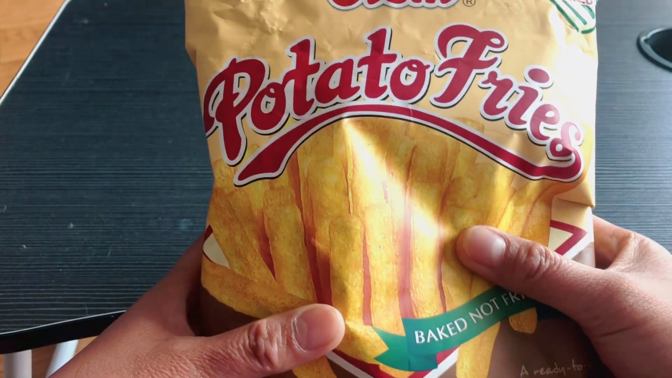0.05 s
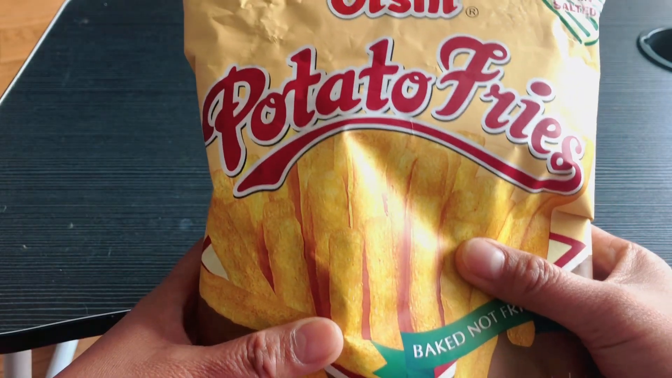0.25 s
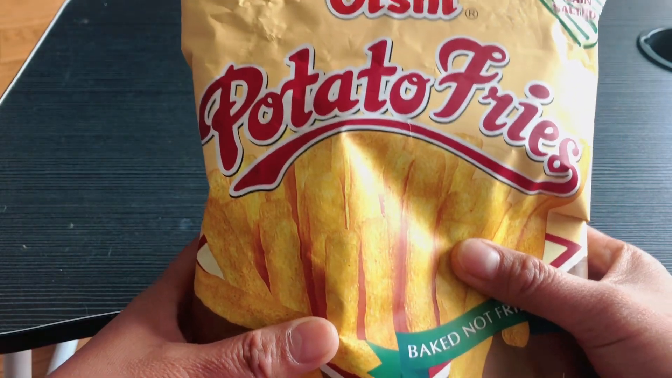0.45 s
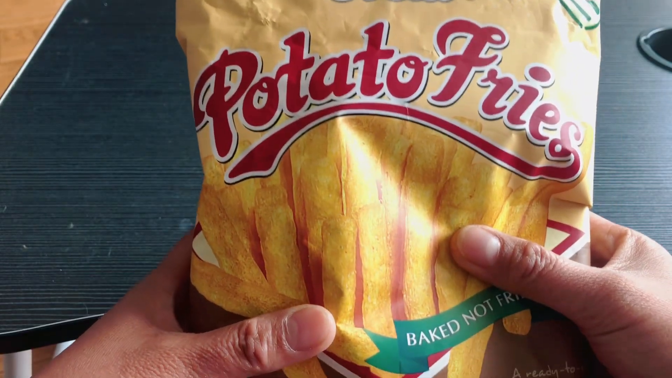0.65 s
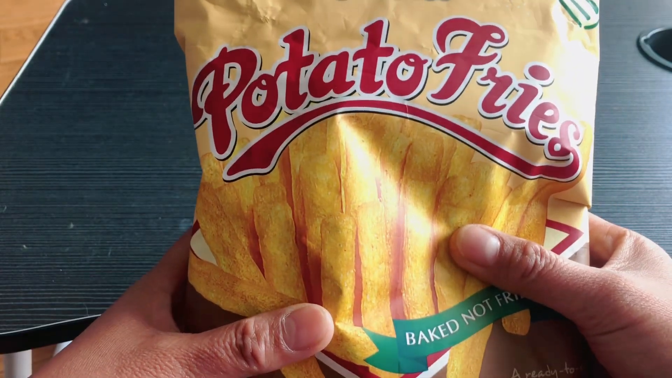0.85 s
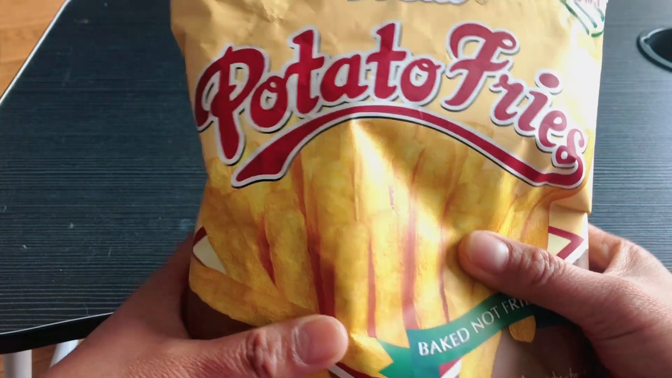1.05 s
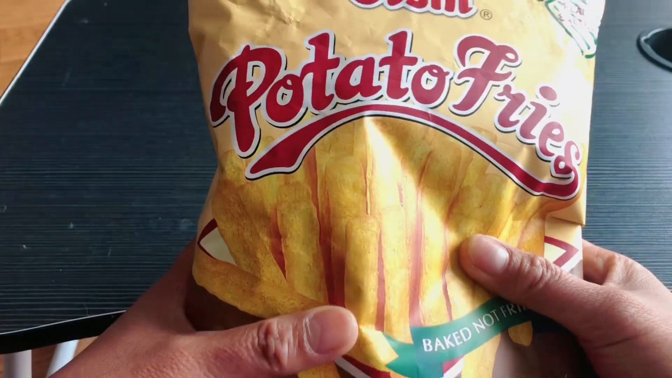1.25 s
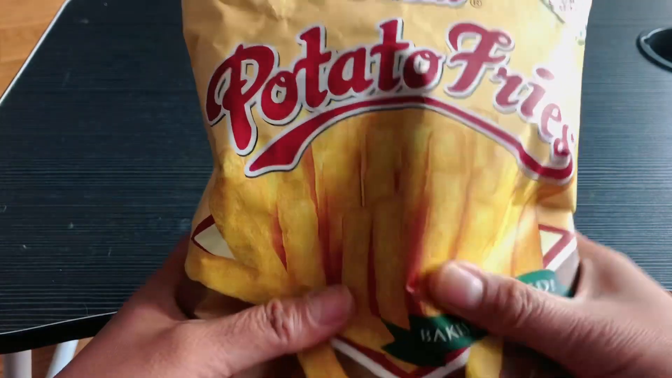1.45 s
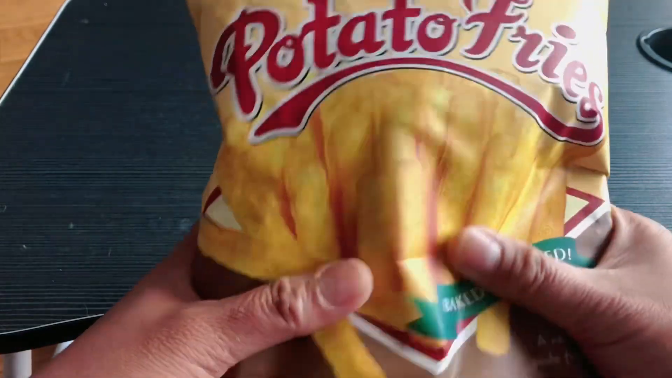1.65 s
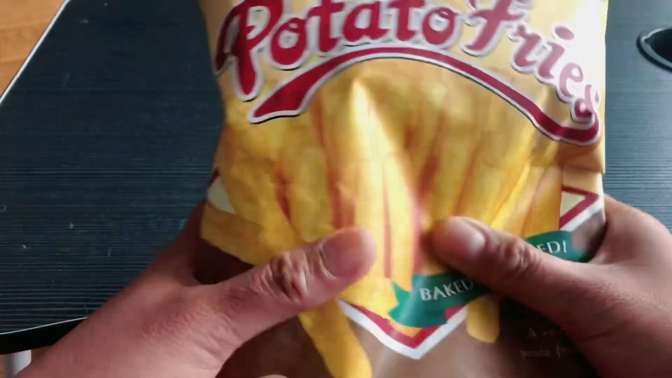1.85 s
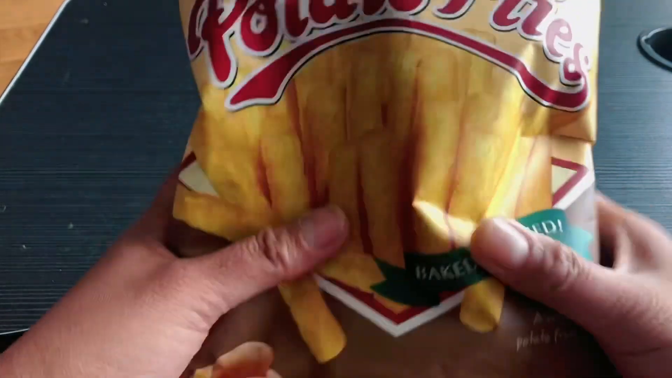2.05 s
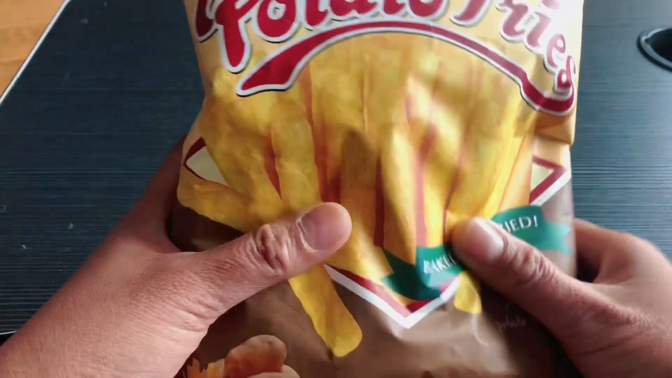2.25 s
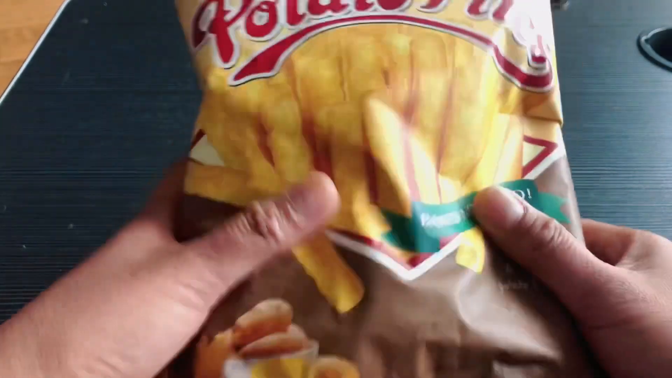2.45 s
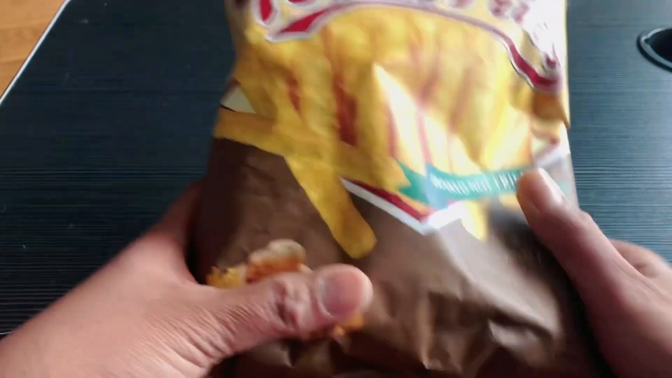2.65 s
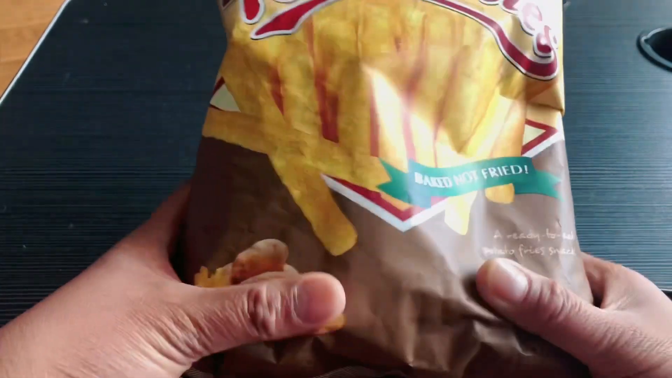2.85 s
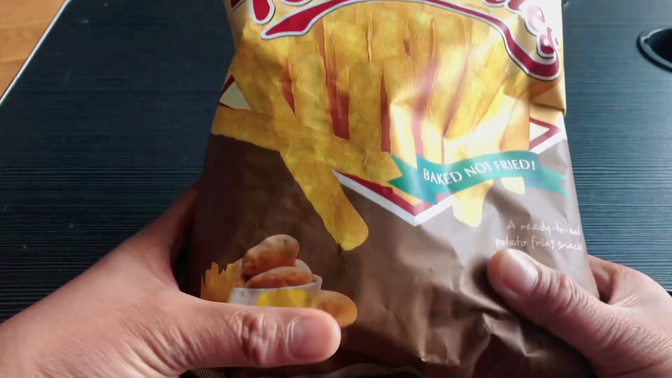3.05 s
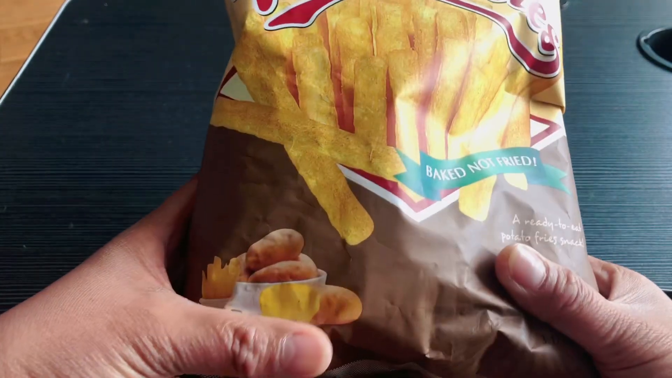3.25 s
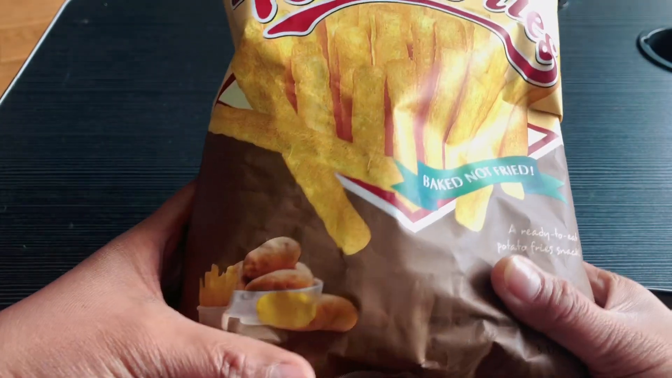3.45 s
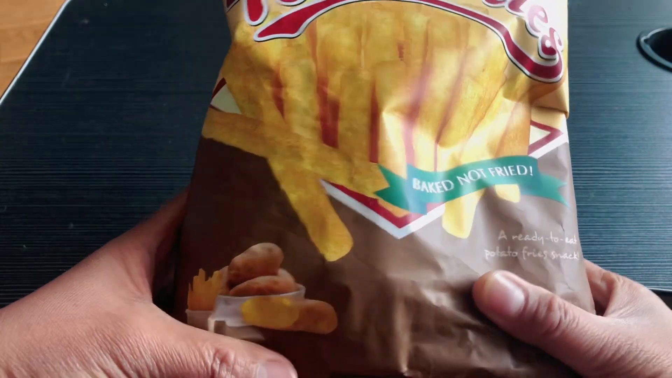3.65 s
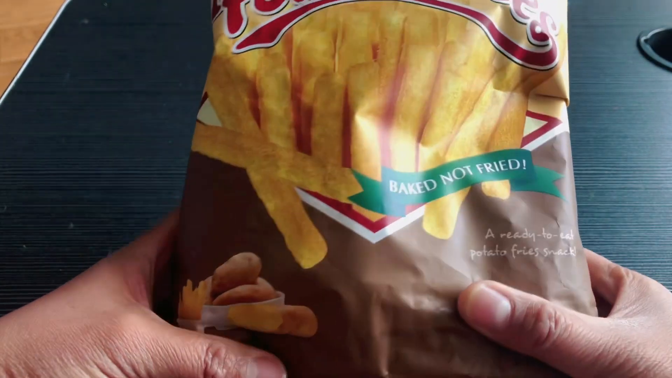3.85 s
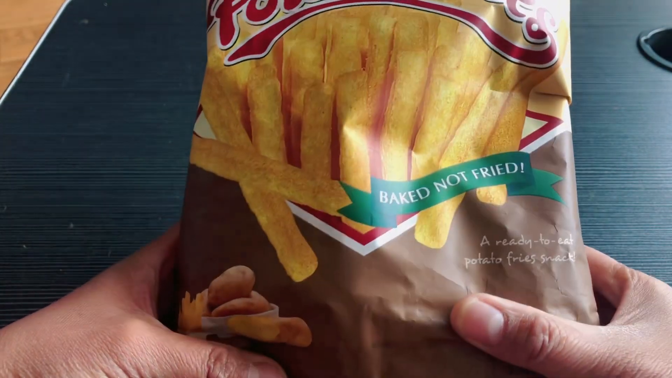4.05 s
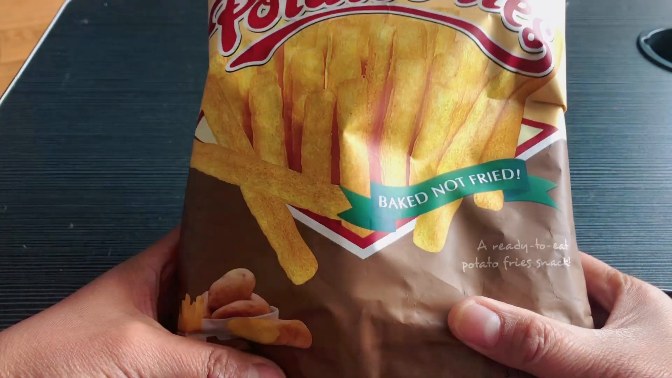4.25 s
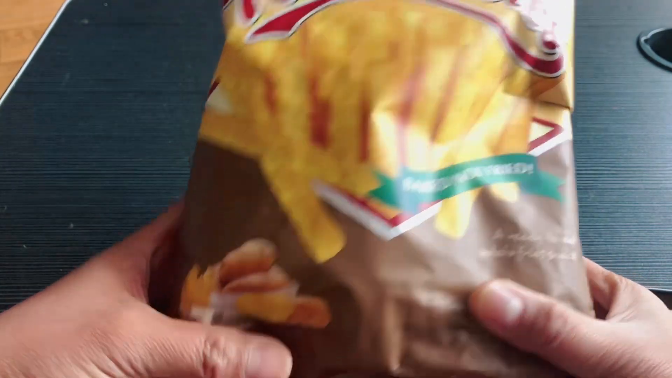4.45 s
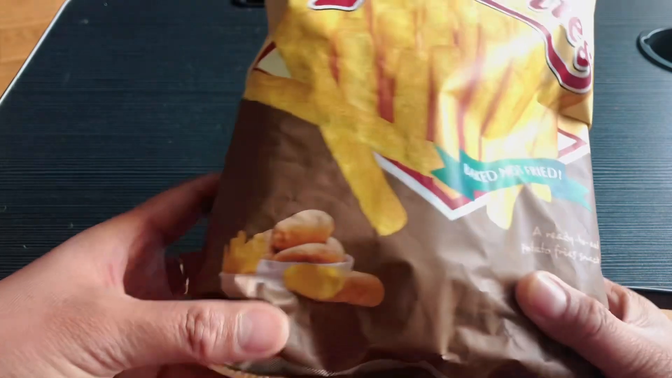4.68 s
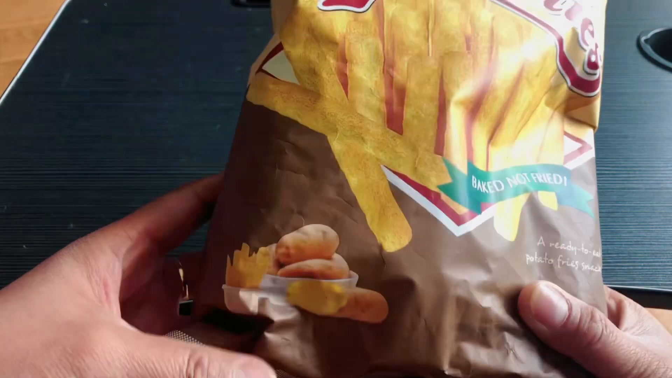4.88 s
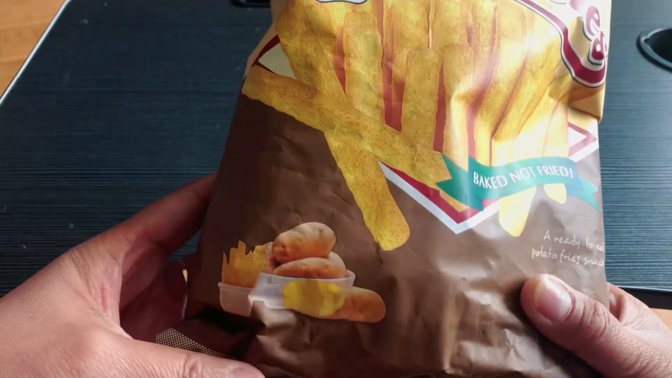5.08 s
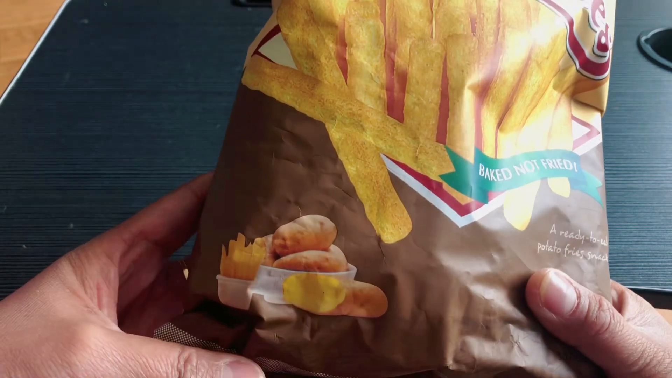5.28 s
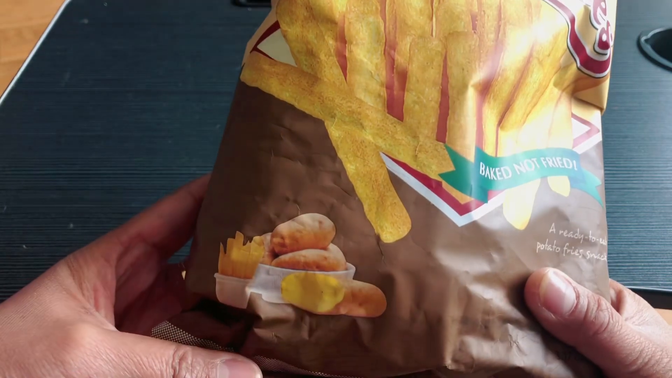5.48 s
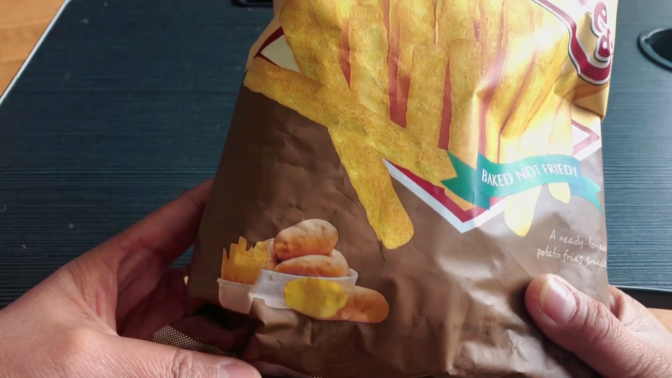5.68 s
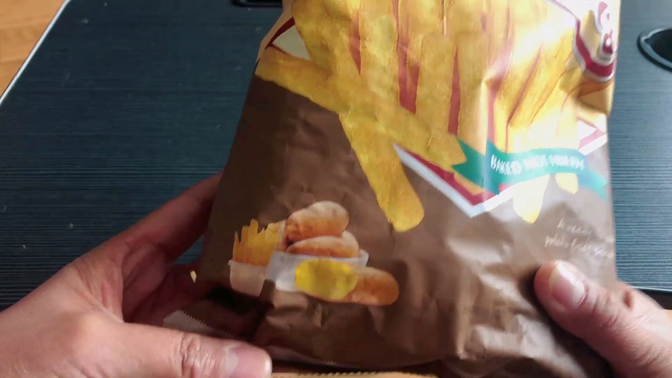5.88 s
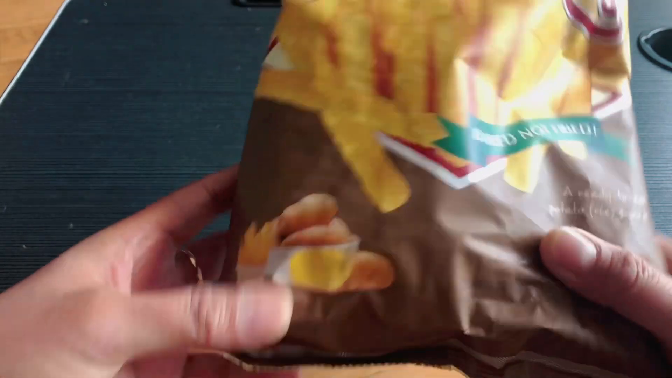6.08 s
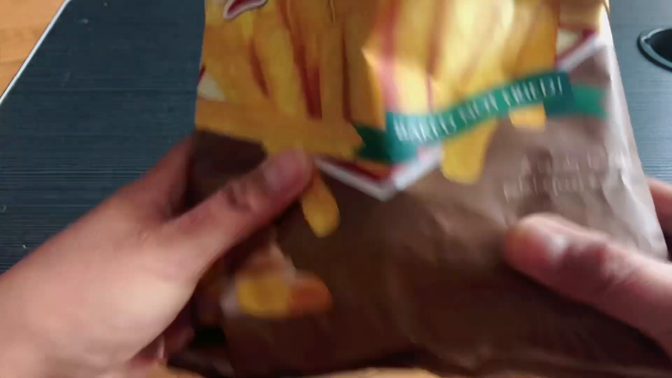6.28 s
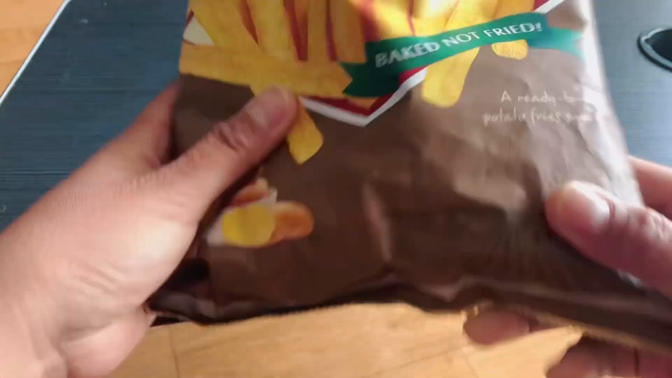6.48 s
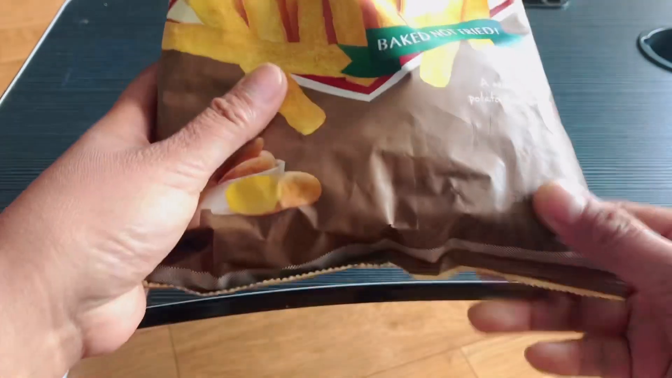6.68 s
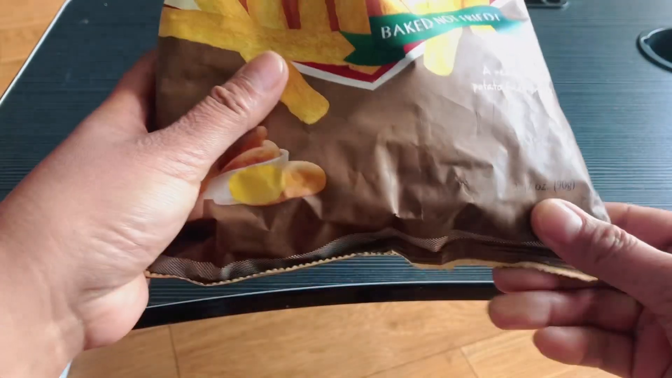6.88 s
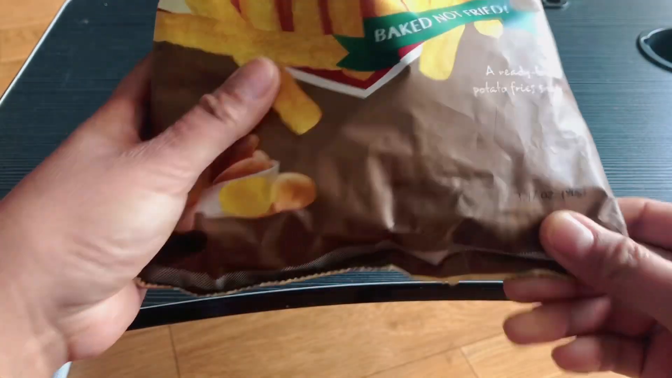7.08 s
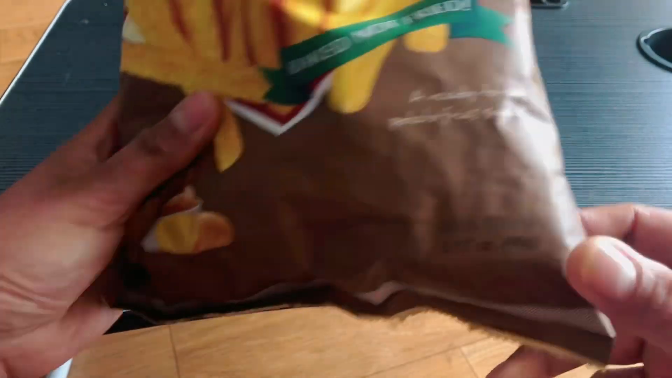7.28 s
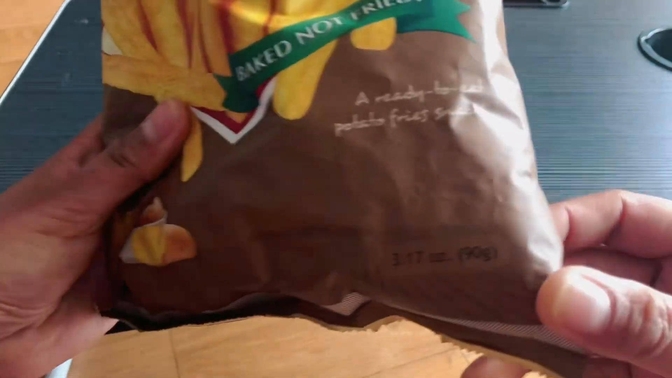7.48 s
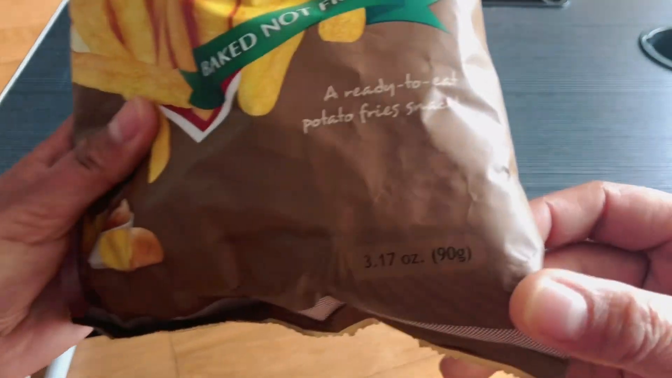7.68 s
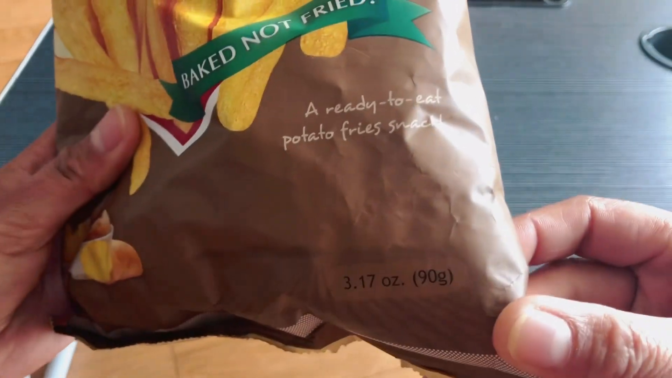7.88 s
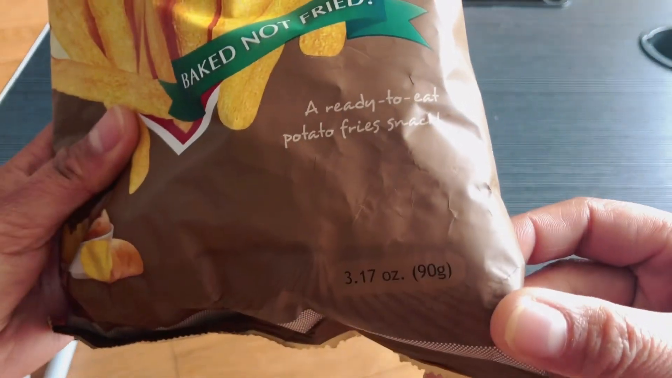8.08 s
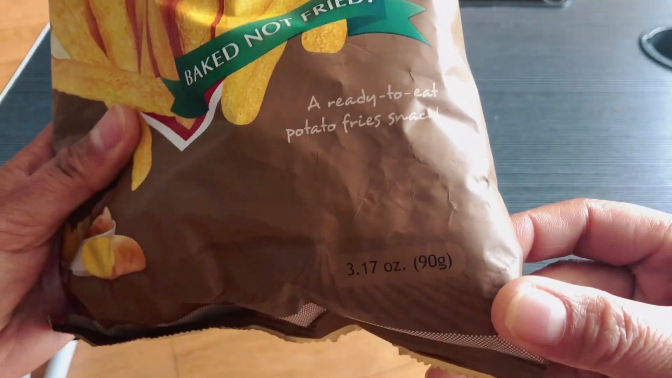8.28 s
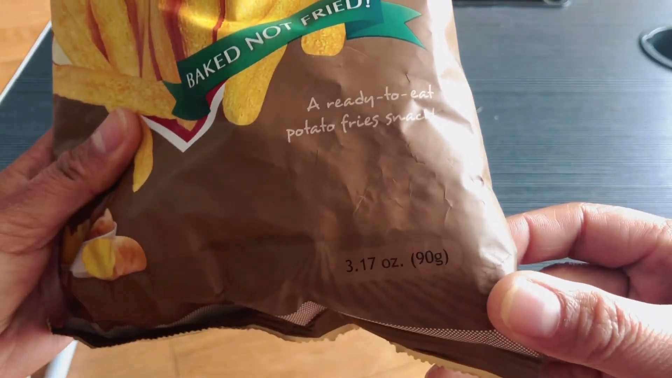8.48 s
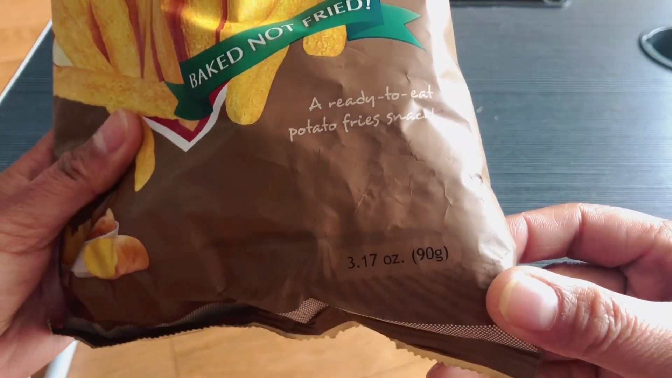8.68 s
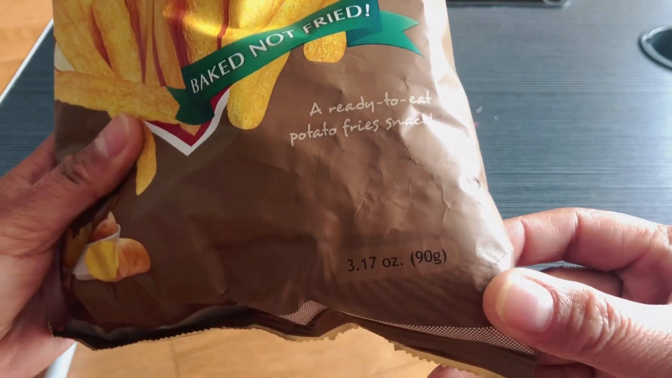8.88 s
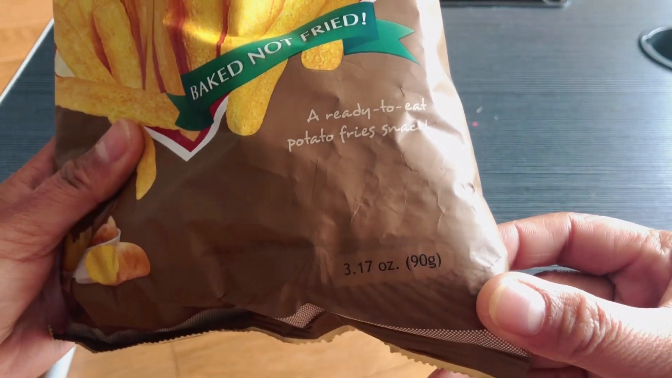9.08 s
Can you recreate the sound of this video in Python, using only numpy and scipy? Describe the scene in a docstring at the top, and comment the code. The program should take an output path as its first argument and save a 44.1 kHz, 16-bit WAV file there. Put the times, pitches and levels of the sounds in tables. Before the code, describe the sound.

A thin, air-filled plastic snack bag crackles and crinkles in handling hands, with soft air thuds, then settles into near silence in a quiet room.

```python
"""Two hands turn an air-filled plastic snack bag over a desk, close to a phone in a quiet room.
Over still air and faint mains hum, a few light ticks lead into a dense crackle from about 1 s; it thins near
4 s, gathers again near 5 s and 6 s, and dies to stray faint ticks after 8 s. Creases snap with bending waves that
chirp down through the film. Squeezes on top of the hands' steady strain drive lesser snaps, a swarm of tiny
buckles and the rub of fingers; trapped air thuds under the presses, and desk and walls echo the film."""
import sys
import numpy as np
from scipy import signal
from scipy.fft import rfft, irfft
from scipy.io import wavfile
from scipy.ndimage import uniform_filter1d

SR = 44100
rng = np.random.default_rng(int(sys.argv[2]) if len(sys.argv) > 2 else 0)


def int16_out(signal):
    """Quantize to a 16-bit WAV file."""
    q = np.round(np.clip(np.atleast_2d(signal).T, -1, 1) * 32767)
    wavfile.write(sys.argv[1], SR, q.astype(np.int16))


N = 402633
TIME = np.arange(N) / SR
TOP_HZ = 15900  # upper limit of the phone
SNAP_SIZE = 1024  # samples that hold one snap
FIRM_DB = -33  # crinkle level of a firm grip

# colour of the crinkling film: (pitch_hz, relative_level_db)
FILM_COLOUR = [(30, -50), (60, -14), (105, -3), (200, -2.5), (310, 1.5), (500, -8.5), (950, -3), (1700, -3),
               (3600, -10.5), (6500, -13.5), (8500, -16.5), (14500, -20.5), (16000, -31)]


def undb(db):
    """Decibels to gain."""
    return 10 ** (np.asarray(db) / 20)


def unit(x):
    """Scale to rms 1."""
    return x / np.sqrt(np.mean(x ** 2))


def slope(hz, points):
    """Gain at hz of (Hz, dB) points joined on a log-frequency axis."""
    at, db = np.transpose(points)
    return undb(np.interp(np.log(hz + 1), np.log(at), db))


def colour(x, points):
    """Filter a signal by the gain curve of (Hz, dB) points."""
    return irfft(rfft(x) * slope(np.fft.rfftfreq(len(x), 1 / SR), points), len(x))


def butter(x, hz, kind, order=2):
    """Causal high-, low- or band-pass."""
    return signal.sosfilt(signal.butter(order, hz, kind, fs=SR, output="sos"), x)


def causal(gain):
    """Minimum-phase spectrum of a gain curve: nothing sounds before the blow."""
    cepstrum = irfft(np.log(gain + 1e-9))
    half = len(cepstrum) // 2
    cepstrum[1:half] *= 2
    cepstrum[half + 1:] = 0
    return np.exp(rfft(cepstrum))


def resonance(hz, centre_hz, q):
    """Spectrum of a heavily damped patch of film, falling away on both sides of its pitch."""
    return (1 + 1j * q * (hz / centre_hz - centre_hz / (hz + 1))) ** -2


def decay(t, t60_s):
    """Exponential fade that loses 60 dB in t60_s."""
    return np.exp(-np.log(1000) * t / t60_s)


def add(out, s, sound):
    """Mix a sound in at time s."""
    i = int(np.clip(s * SR, 0, N - 1))
    out[i:i + len(sound)] += sound[:N - i]


def background(air_db=-58.5):
    """Still air as coloured noise, with steady sines for the hum of a mains appliance."""
    # still room: (pitch_hz, relative_level_db)
    air_colour = [(25, -43.5), (45, -15), (60, -6), (72, -2), (88, -11.5), (110, -13.5), (180, -9),
                  (245, -9.5), (300, -11), (420, -18), (2000, -28), (2800, -31), (14800, -38), (16000, -39)]
    # mains hum: (pitch_hz, rms_level_db)
    hum_tones = [(59.8, -71.5), (120, -67), (241, -65.5)]
    hum = 0
    for hz, db in hum_tones:
        hum = hum + np.sqrt(2) * undb(db) * np.sin(2 * np.pi * (hz * TIME + rng.random()))
    air = unit(colour(rng.standard_normal(N), air_colour))
    return hum + undb(air_db) * air


def room(x, t60_low_s=0.33, t60_high_s=0.5, near_t60_s=.035, first_s=0.01, wet_db=-1, near_db=-15):
    """Hands and body scatter the sound at once; the walls answer later, their upper part fading more slowly."""
    # how strongly the walls answer: (pitch_hz, relative_level_db)
    wall_colour = [(60, 3), (160, -9), (240, -1.5), (295, -4.5), (380, -6.5), (600, -9.5), (1200, -9.5),
                   (2200, -13.5), (3500, -16), (8000, -17.5), (16000, -15.5)]
    t = TIME[:SR // 2]
    noise = rng.standard_normal(len(t))
    low = butter(noise, 1500, "low", order=1)
    walls = low * decay(t, t60_low_s) + (noise - low) * decay(t, t60_high_s)
    walls = walls * (t > first_s)
    # the second half of the echo also fades to silence
    fade = np.clip(2 * (1 - t / t[-1]), 0, 1)
    walls = colour(walls / np.linalg.norm(walls), wall_colour) * fade
    near = rng.standard_normal(len(t)) * decay(t, near_t60_s)
    echo = undb(wet_db) * walls + undb(near_db) * near / np.linalg.norm(near)
    return signal.oaconvolve(x, echo)[:N]


def thuds(t60_s=0.11, rise_s=0.0056, sag=.3, thud_db=-2):
    """The trapped air takes each press with a soft low bump whose pitch sags."""
    # fingers pressing on the air inside: (start_s, peak_db before thud_db, pitch_hz that the sag passes through)
    presses = [(1.157, -34, 90.4), (1.426, -33, 85), (1.726, -33.5, 112), (1.963, -27.5, 111),
               (2.155, -25.5, 104), (2.409, -40.5, 93), (2.52, -33.5, 85.4), (2.625, -39, 70),
               (5.055, -32.5, 101), (6.33, -35.5, 80), (7.14, -42, 92)]
    out, t = np.zeros(N), TIME[:SR // 8]
    shape = (1 - np.exp(-t / rise_s)) * decay(t, t60_s)
    for s, db, hz in presses:
        pitch_hz = hz * (1 + sag * (2 * np.exp(-2 * t / t60_s) - 1.5))
        turns = np.cumsum(pitch_hz) / SR
        add(out, s, undb(db + thud_db) * shape / shape.max() * np.sin(2 * np.pi * turns))
    return out


def hands(grip_db_per_s=417, release_db_per_s=340.5, strain_hollow_db=-2.5, strain_crisp_db=-4.5,
          hollow_per_db=0.1706):
    """Effort, hollowness and crispness in dB: each squeeze builds, holds and lets go over the steady strain."""
    # strain of the hands as they hold, turn and rest the bag: (time_s, crinkle_db before crinkle's trim)
    strain_points = [(0, -73), (0.45, -65), (0.89, -68), (0.96, -42), (2.75, -37.5), (3.08, -48),
                     (3.75, -40), (4.07, -50), (4.25, -63), (4.8, -50), (5.45, -60), (5.68, -72),
                     (5.85, -50.5), (6.75, -48), (7.3, -43), (7.58, -57), (8.1, -73.5), (9.13, -67)]
    # shifts of grip: (start_s, hold_s, crinkle_db before crinkle's trim, then relative to it:
    # hollow_flex_db, crisp_edge_db)
    squeezes = [(1.057, .03, -34, 5.5, -12.5), (1.165, .02, -30, -9, -6.5), (1.239, .015, -31.5, 3, -19),
                (1.298, .165, -31, -1.5, -5), (1.599, .07, -30.5, -0.5, -7), (1.701, .1, -28.5, 0, -1),
                (1.908, .075, -23.5, -3.5, -11), (2.112, .05, -24, -1, -10.5),
                (2.292, .03, -32.5, -1, -7.5), (2.365, .17, -29.5, 1, -7), (2.603, .03, -34.5, 2.5, -13),
                (2.84, .11, -34, -0.5, 0.5), (3.127, .02, -40, -12, -10), (3.234, .12, -44, -10, -9),
                (3.443, .035, -39.5, -12, -1), (3.567, .06, -34, 1, -1.5), (3.916, .07, -47.5, 1.5, -13),
                (4.41, .04, -49, 8, -10), (4.491, .04, -40, 4, -4.5), (4.787, .08, -40, 4, -10),
                (4.96, .05, -35, 1.5, -5.5), (5.05, .07, -31.5, -5, -4.5), (5.49, .015, -50, -2, -6),
                (6.03, .11, -32, -1.5, -8.5), (6.285, .05, -23, -2, -6.5), (6.498, .13, -31, -7.5, -4),
                (6.865, .07, -42, -2.5, -3.5), (7.102, .14, -34.5, -5, -1.5), (7.412, .025, -44, 6.5, -8),
                (7.668, .02, -45.5, 3, -3), (7.798, .12, -61, -3, -6), (8.4, .03, -54, -7, -0.5),
                (8.645, 0.027, -55.5, -8, -2.5)]
    strain = np.interp(TIME, *np.transpose(strain_points))
    # a light touch only flexes broad, hollow panels
    strain_flex = strain + strain_hollow_db + hollow_per_db * (FIRM_DB - strain)
    power = undb([strain, strain_flex, strain + strain_crisp_db]) ** 2
    for start, hold, db, hollow_db, crisp_db in squeezes:
        building = grip_db_per_s * (start - TIME)
        releasing = release_db_per_s * (TIME - start - hold)
        below = np.maximum(building, releasing)  # dB under the held level
        near = below < 60
        squeeze = undb(db - np.maximum(below[near], 0))
        power[:, near] += np.outer(undb([0, hollow_db, crisp_db]), squeeze) ** 2
    effort, flex, edge = 10 * np.log10(power)
    return effort, flex - effort, edge - effort


def buckle(hz, travel_s=0.000909, spread_s=0.002355, scatter=0.5, desk_s=.0018, desk=0.25, count=20):
    """Spectrum of one crease giving way: bending waves run many paths, treble first (speed ~ root of Hz)."""
    length, size = np.pi * rng.random(count), rng.standard_normal(count)
    # delays at 1 kHz; the first path is the direct one
    delay_s = travel_s * rng.uniform(0.57, 1.518) + spread_s * np.append(0, length)
    size = np.append(1, 2 * scatter * size * np.exp(-1.5 * length))
    bending = 4 * np.pi * np.sqrt(1000 * hz)
    paths = size @ np.exp(-1j * np.outer(delay_s, bending))
    desk_delay_s = desk_s * rng.uniform(0.795, 1.206)
    return paths * (1 + desk * np.exp(-2j * np.pi * hz * desk_delay_s))


def swarm(per_s=520, size_db=5, q=0.5, low_hz=190, high_hz=13000, count=160):
    """Small buckles of random size roll softly along many creases, each crease with its own pitch."""
    out, hz = np.zeros(N), np.fft.rfftfreq(SNAP_SIZE, 1 / SR)
    film = causal(slope(hz, FILM_COLOUR))
    creases = []
    for centre in np.geomspace(low_hz, high_hz, count):
        wave = buckle(hz, scatter=.9, spread_s=.0042)
        creases.append(irfft(wave * film * resonance(hz, centre, q)))
    chance, size, which = rng.random(N), rng.standard_exponential(N), rng.integers(count, size=N)
    for i in np.flatnonzero(chance < per_s / SR):
        polarity = (-1) ** i
        add(out, i / SR, polarity * undb(size_db * min(size[i], 3.5)) * creases[which[i]])
    return unit(out)


def crinkle(effort, hollow, crisp, rub_db=-13, flex_hz=620, edge_hz=3800, even_s=.06, trim_db=-1):
    """The swarm and the rub of skin follow the hands; broad flexing sounds hollow, pinching sounds crisp."""
    rub = unit(colour(rng.standard_normal(N), FILM_COLOUR))
    film = swarm() + undb(rub_db) * rub
    parts = [(butter(film, flex_hz, "low", order=4), hollow),
             (butter(film, [flex_hz, edge_hz], "band", order=3), 0),
             (butter(film, edge_hz, "high", order=3), crisp)]
    out, span = 0, int(even_s * SR)
    for part, db in parts:
        # the film gives off as much energy as the hands put in, in few large or many small buckles
        power = uniform_filter1d(uniform_filter1d(part ** 2, span), span // 2)
        even = part / np.sqrt(abs(power) + 1e-9)
        out = out + even * undb(effort + db + trim_db)
    return out


def lesser_snaps(effort, crowding=.36, yield_share=0.76, panel_db=-30.0, crease_db=-29, scatter_db=3,
                 panel_hz=600, crease_hz=3100, octaves=.6, hardest_db=-32, run_s=.012, count=34, size=3):
    """Rows for snaps() of creases yielding in short runs: denser with effort, and louder up to hardest_db."""
    work = np.cumsum(undb(crowding * effort))
    share = (np.arange(count) + rng.random(count)) / count
    runs = np.interp(share, work / work[-1], TIME)
    times = (runs[:, None] + run_s * rng.standard_normal((count, size))).ravel()
    force = yield_share * (np.minimum(np.interp(times, TIME, effort), hardest_db) - FIRM_DB)
    a, b, c, d = np.clip(rng.standard_normal((len(times), 4)), -2, 2).T
    return list(zip(times, panel_hz * 2 ** (octaves * a), panel_db + force + scatter_db * b,
                    crease_hz * 2 ** (octaves * c), crease_db + force + scatter_db * d))


def slipped(snap, slip_s=0.00082, slip_db=-22):
    """A crease slips a little just before it gives way; returns the lead in seconds and the sound."""
    lead = int(slip_s * rng.uniform(0.67, 1.5) * SR)
    return lead / SR, np.pad(snap, (lead, 0)) + undb(slip_db) * np.pad(snap, (0, lead))


def snaps(rows, panel_q=0.58, crease_q=0.97, low_hz=190, soft_ratio=2.6, edge_hz=12000, edge_db=-17,
          tight_db=7, level_s=.005):
    """A crease cracks and the panel beside it pops; returns the sound towards the phone and the walls."""
    out, hz = np.zeros((2, N)), np.fft.rfftfreq(SNAP_SIZE, 1 / SR)
    # panels are too small to radiate deep bass
    radiation = causal(hz ** 2 / np.hypot(hz ** 2, low_hz ** 2) + 1e-3)
    for s, panel_hz, panel_db, crease_hz, crease_db in rows:
        # a broad panel flips softly
        panel = resonance(hz, panel_hz, panel_q) / (1 + 1j * hz / (soft_ratio * panel_hz))
        # the sharp end of a crease adds a tick, more so the tighter (higher) it is
        tick_db = edge_db + tight_db * np.log2(crease_hz / 4000)
        tick = undb(tick_db) * resonance(hz, edge_hz, 1)
        crease = causal(np.hypot(abs(resonance(hz, crease_hz, crease_q)), abs(tick)))
        # the walls gather sound from all sides of the bag, so the paths' notches average out
        waves = buckle(hz), buckle(hz, scatter=0, desk=0)
        for side, wave in zip(out, waves):
            for voice, db in ((panel, panel_db), (crease, crease_db)):
                spectrum = wave * radiation * voice
                # mean power over level_s, counting what the phone passes
                power = 2 * np.sum(abs(spectrum[hz < TOP_HZ]) ** 2) / (SNAP_SIZE * level_s * SR)
                lead_s, sound = slipped(irfft(spectrum) * undb(db) / np.sqrt(power))
                add(side, s - lead_s, sound)
    return out


def scene():
    """The bag in its room: film and thuds heard directly, the film also by way of the room."""
    # creases that stand out singly, from faint ticks to loud cracks, levels as rms over 5 ms:
    # (time_s, panel_pitch_hz, panel_pop_db, crease_pitch_hz, crease_crack_db)
    single_snaps = [(0.281, 740, -46.5, 3000, -69.5), (0.3871, 1060, -39, 3840, -59),
                    (0.577, 370, -44.5, 3100, -51.5), (0.8107, 260, -29.5, 1000, -46),
                    (0.9338, 990, -27.5, 3700, -41), (0.9542, 458, -20.5, 1510, -14.5),
                    (1.0423, 966, -8.5, 3820, -30.5), (1.0841, 810, -25, 2850, -23.5),
                    (1.1502, 900, -17, 4500, -18.5), (1.1536, 210, -18, 1660, -9.5),
                    (1.233, 490, -16, 1810, -22.5), (1.2827, 920, -20.5, 8200, -17),
                    (1.3872, 1260, -16, 5070, -16.5), (1.4235, 490, -25, 4600, -15.5),
                    (1.4406, 1330, -16.5, 4970, -21), (1.4833, 306, -24, 1640, -23.5),
                    (1.6185, 784, -21.5, 4330, -25.5), (1.7277, 920, -21, 7560, -23.5),
                    (1.748, 1420, -18.5, 11800, -16), (1.9255, 520, -11, 2220, -16),
                    (1.9372, 527, -22, 6400, -25.5), (2.0057, 507, -16.5, 4020, -17.5),
                    (2.0857, 1300, -24, 5200, -16.5), (2.107, 560, -12, 5500, -24.5),
                    (2.1312, 553, -16, 2280, -30.5), (2.151, 400, -30, 1490, -26),
                    (2.164, 690, -17.5, 5030, -14), (2.2295, 610, -22, 1490, -22.5),
                    (2.3439, 595, -20, 2560, -23.5), (2.3842, 255, -25.5, 1640, -17),
                    (2.417, 300, -30, 6200, -18), (2.464, 720, -34.5, 4670, -22.5),
                    (2.504, 850, -15.5, 5450, -13.5), (2.6107, 795, -19.5, 5700, -16),
                    (2.7047, 1310, -25.5, 4940, -26.5), (2.7889, 690, -19.5, 5050, -16),
                    (2.9629, 710, -24.5, 3360, -25.5), (3.111, 840, -40, 4870, -24),
                    (3.1251, 540, -27, 3700, -31), (3.143, 1120, -29, 4970, -21.5),
                    (3.2062, 1090, -23, 4330, -31), (3.2329, 675, -23, 2500, -26),
                    (3.2754, 320, -33, 2050, -24.5), (3.3554, 684, -30.5, 4620, -26.5),
                    (3.4448, 486, -36, 1580, -29), (3.6085, 466, -31, 3770, -27),
                    (3.787, 990, -29.5, 4700, -30.5), (4.013, 450, -57, 6860, -28.5),
                    (4.0356, 660, -24, 3140, -22.5), (4.101, 637, -15.5, 5700, -23.5),
                    (4.5066, 800, -24, 2690, -22.5), (4.6846, 530, -25.5, 1700, -53),
                    (4.7856, 484, -26.5, 3300, -23.5), (4.8672, 524, -18.5, 2270, -22.5),
                    (4.9147, 380, -29, 3500, -28), (4.9504, 1270, -23, 3300, -18.5),
                    (5.0115, 570, -13, 4120, -18), (5.0164, 507, -17, 3100, -28),
                    (5.0572, 696, -22.5, 6030, -15), (5.1186, 770, -30.5, 7950, -15),
                    (5.1557, 525, -18, 4400, -15.5), (5.24, 686, -33, 2380, -25.5),
                    (5.254, 1790, -24, 4570, -21), (5.2722, 660, -37, 6550, -17.5),
                    (5.4162, 332, -39.5, 3550, -27.5), (5.7255, 1450, -24.5, 2710, -23),
                    (5.8731, 465, -60, 3700, -34.5), (5.9173, 630, -51.5, 8000, -34),
                    (6.0035, 336.6, -48, 3570, -19.5), (6.1261, 257, -23.5, 1900, -24),
                    (6.211, 1260, -18.5, 2180, -16), (6.2381, 290, -42, 2270, -16),
                    (6.2549, 543, -20, 4260, -29.5), (6.303, 585, -25, 4360, -16),
                    (6.3281, 550, -31, 6860, -16.5), (6.4735, 1720, -19.5, 3200, -16),
                    (6.5486, 787, -22, 3580, -14), (6.5898, 1370, -23, 4420, -23.5),
                    (6.6643, 970, -27.5, 3440, -18), (6.8481, 630, -34.5, 4870, -32),
                    (6.9147, 800, -21, 3050, -11.5), (6.999, 754, -22.5, 3600, -31),
                    (7.2155, 410, -41.5, 3560, -18.5), (7.2485, 770, -37, 3020, -23.5),
                    (7.2563, 860, -29.5, 4200, -17.5), (7.2681, 650, -49, 6430, -22),
                    (7.3629, 750, -25, 3000, -14), (7.388, 272, -32, 1840, -20.5),
                    (7.418, 696, -20.5, 5850, -27.5), (7.6589, 1408, -23, 4770, -19),
                    (8.4206, 1590, -38.5, 6830, -33), (8.664, 890, -46.5, 3600, -52),
                    (8.7848, 241, -55, 5160, -48.5), (8.8057, 341, -50, 7900, -46),
                    (9.0447, 340, -50, 2550, -52)]
    effort, hollow, crisp = hands()
    direct, outward = snaps(single_snaps + lesser_snaps(effort))
    rustle = crinkle(effort, hollow, crisp)
    echo = room(outward + rustle)
    return (direct + rustle + thuds() + echo + background())[None]


def record(dry):
    """The phone rounds off the tallest peaks and cuts the top."""
    rounded = dry / (1 + dry ** 4) ** .25
    return signal.sosfilt(signal.ellip(8, .2, 70, TOP_HZ, fs=SR, output="sos"), rounded)


dry = scene()
out = record(dry)
int16_out(out)
```